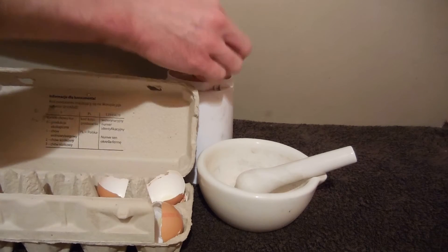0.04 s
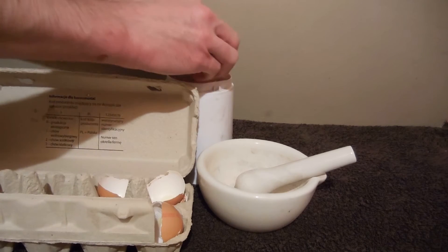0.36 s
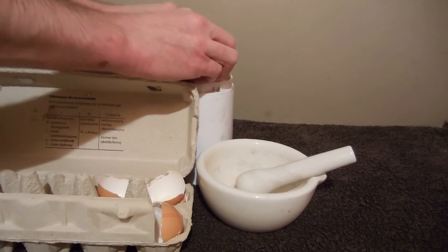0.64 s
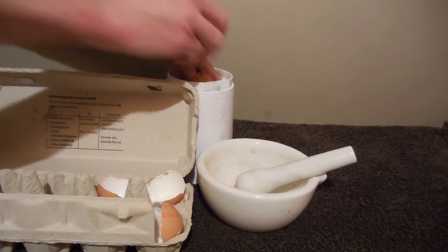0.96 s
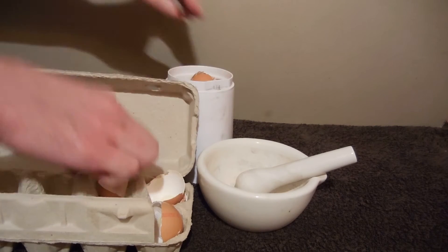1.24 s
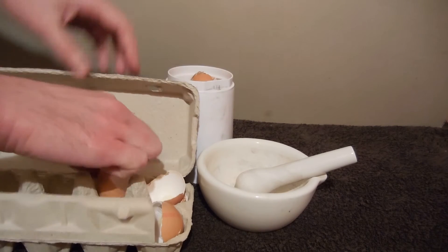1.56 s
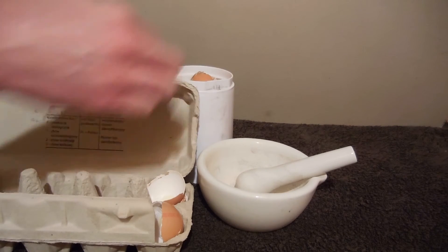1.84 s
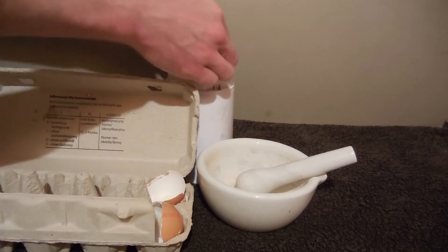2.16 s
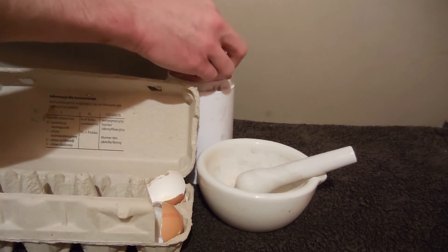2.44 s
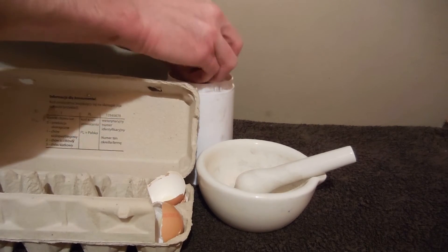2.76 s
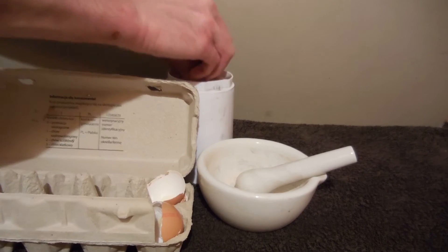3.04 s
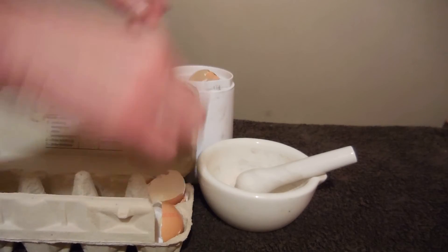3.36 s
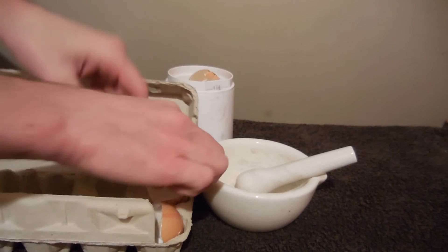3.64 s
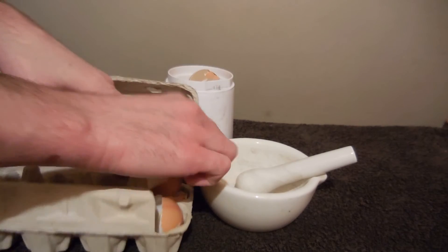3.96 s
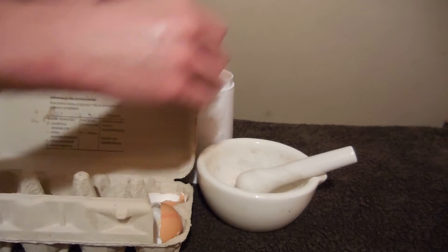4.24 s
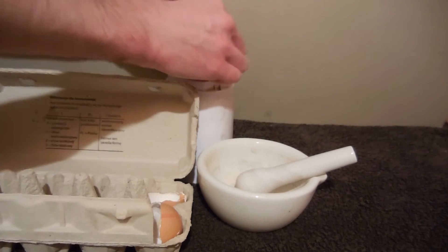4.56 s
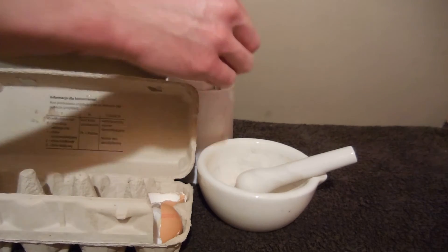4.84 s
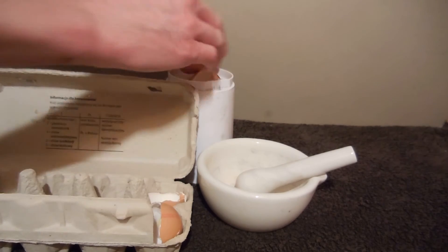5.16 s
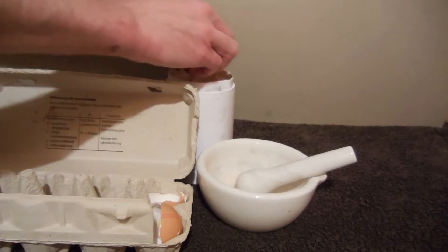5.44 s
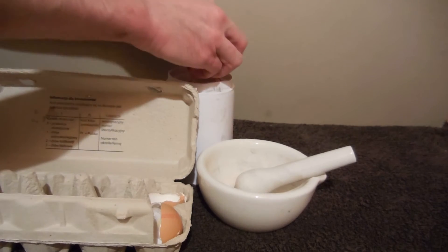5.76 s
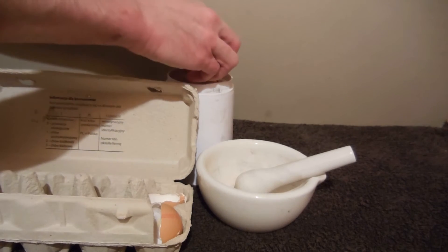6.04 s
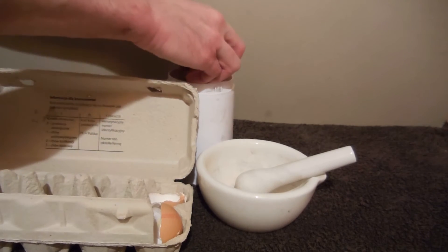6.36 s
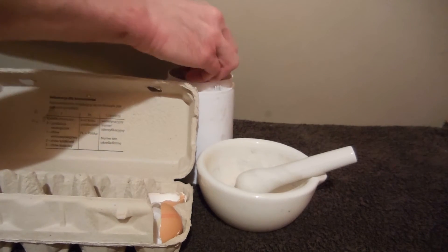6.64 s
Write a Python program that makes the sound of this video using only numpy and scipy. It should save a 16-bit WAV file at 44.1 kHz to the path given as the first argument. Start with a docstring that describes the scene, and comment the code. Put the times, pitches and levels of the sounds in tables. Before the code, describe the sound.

Close, brittle snaps and crunches of eggshell being pushed into a plastic cup, broken by pauses with soft rustles and scrapes.

```python
"""Eggshells in a grinder cup

A small room, a stereo microphone close by. Fingers press eggshell halves into a grinder's plastic cup.
The shell gives way in single snaps and in crunches of many tiny fractures; the cup rings and knocks along.
Between presses the pulp carton rustles and a shell scrapes and squeaks on the rim, over a quiet hiss."""
import sys
import numpy as np
from scipy import signal
from scipy.io import wavfile

SR = 44100
rng = np.random.default_rng(int(sys.argv[2]) if len(sys.argv) > 2 else 0)


def transcribe(signal):
    """Save signal, clipped to [-1, 1], as a 16-bit WAV file at the path in sys.argv[1]."""
    frames = np.atleast_2d(signal).T
    limited = np.clip(frames, -1, 1)
    pcm = np.round(limited * 32767).astype(np.int16)
    wavfile.write(sys.argv[1], SR, pcm)


N = 295911
EDGE_HZ = 15900  # top of the microphone's band

# A piece of shell caves in. Each row: start and length in seconds, crack and ring in relative dB,
# ring pitch in Hz.
CRUNCHES = [(0.099, 0.0085, -30, -28.5, 2350), (0.236, 0.021, -19, -22.5, 2350),
            (0.355, 0.034, -17.5, -17.5, 2080), (.544, 0.0097, -18.5, -18, 1900),
            (0.566, 0.012, -15.5, -19.5, 2070), (0.644, .01, -21.5, -44, 1980),
            (.783, 0.015, -24, -29.5, 1880), (0.998, 0.022, -38, -45, 2030),
            (2.128, 0.036, -38.5, -37.5, 2180), (2.236, 0.038, -26, -19, 2240),
            (2.451, 0.028, -25, -27, 2220), (2.596, 0.035, -29, -27, 2200), (2.64, 0.034, -19, -22.5, 2120),
            (2.799, 0.014, -21, -28, 2030), (2.903, 0.019, -22.5, -32, 1950),
            (5.434, 0.02, -30, -31.5, 1960), (5.579, 0.036, -30.5, -52, 2120),
            (5.743, 0.038, -34.5, -35.5, 2220), (5.813, 0.031, -28.5, -28.5, 2200),
            (5.974, 0.0072, -19, -18.5, 1890), (6.159, 0.02, -31.5, -34, 2130),
            (6.2, 0.024, -24, -29, 2300), (6.218, 0.014, -15.5, -17.5, 2230),
            (6.248, 0.017, -16.5, -21, 2070), (6.374, 0.0067, -28, -18, 2310),
            (6.465, 0.0091, -22, -19.5, 2460), (6.482, 0.056, -31, -28, 2500),
            (6.654, 0.012, -32, -35.5, 2370)]
# Spectra of the shell's crack and the cup's knock. Each row: frequency in Hz, relative level in dB.
CRACK_SPECTRUM = [(500, -48), (1500, -12), (3000, -3), (4200, 0), (6000, -0.5), (9000, 0.5), (13500, -0.5),
                  (16000, -2.5)]
KNOCK_SPECTRUM = [(25, -38), (48, -27), (65, -8.5), (110, -17), (200, -8), (300, -5), (560, 5.5),
                  (1100, 11), (1600, -21), (3000, -45.5)]


def amp(db):
    """Decibels to gain."""
    return 10 ** (np.asarray(db) / 20)


def read(points, hz):
    """Reads a table along a log-frequency axis."""
    f, value = np.transpose(points)
    return np.interp(np.log(hz + 1), np.log(f), value)


def sized(x, db, seconds):
    """Gives x the energy of a sound that holds db for so many seconds."""
    return x * amp(db) * np.sqrt(seconds * SR / (np.mean(x ** 2, 0).sum() + 1e-20))


def add(mix, start, sound):
    """Lays a stereo sound into the mix at start seconds."""
    part = mix[:, max(round(start * SR), 0):][:, :sound.shape[1]]
    part += sound[:, :part.shape[1]]


def pair(size, alike):
    """White noise at two microphones, which share the fraction alike of its power."""
    noise = rng.standard_normal((3, size))
    return np.sqrt(alike) * noise[0] + np.sqrt(1 - alike) * noise[1:]


def colour(points):
    """A minimum-phase filter of energy 1 with the given spectrum."""
    log_gain = np.log(amp(read(points, abs(np.fft.fftfreq(4096, 1 / SR)))))
    taps = np.fft.ifft(np.exp(np.conj(signal.hilbert(log_gain)))).real[:2048]
    return taps / np.linalg.norm(taps)


def through(x, taps):
    """Filters both channels and keeps the length."""
    return signal.fftconvolve(x, np.atleast_2d(taps), axes=1)[:, :x.shape[1]]


def held(t, length, rise_s, release_s):
    """A force that builds from t = 0, holds until length and dies away."""
    return np.clip(t / rise_s, 0, 1) * np.exp(-np.maximum(t - length, 0) / release_s)


def stroke(length, rise_s):
    """One short push of the fingers."""
    return held(np.arange(SR // 5) / SR, length, rise_s, release_s=0.011)


def grit(size, per_s, spread_db, grain_s):
    """Envelope of rms 1: tiny fractures at random moments, most weak and a few strong."""
    strength = amp(spread_db * np.minimum(rng.exponential(1, size), 3.5))
    strength *= rng.random(size) < per_s / SR
    power = signal.lfilter([1], [1, -np.exp(-2 / (grain_s * SR))], strength ** 2)
    return np.sqrt(power / (power.mean() + 1e-20) + 1e-6)


def shell(x, hz, width_hz):
    """The quickly damped resonance of a curved piece of shell."""
    b, a = signal.iirpeak(hz, hz / width_hz, SR)
    return signal.lfilter(b, a, signal.lfilter(b, a, x))


def splinter(x, ring_db, band_hz=(3800, 14000), width_hz=800, count=4):
    """Every fragment adds a few bright, quickly damped resonances of its own."""
    low, high = band_hz
    pitches = low * (high / low) ** rng.random(count)
    ring = sum(signal.lfilter(*signal.iirpeak(hz, hz / width_hz, SR), x) for hz in pitches)
    return x + amp(ring_db) * ring


def piece_hz(t):
    """The ring pitch of the piece of shell being pressed at time t."""
    pieces = np.array(CRUNCHES)
    return np.interp(t, pieces[:, 0], pieces[:, -1])


def unrest(loose_db=-19.5):
    """How much the fragments move: under the fingers, and for a while after each crunch."""
    # The fingers bear down. Each row: start and length in seconds, relative level in dB.
    presses = [(0, 0.049, -31.5), (.19, .03, -40.5), (0.296, 0.05, -30), (0.486, 0.25, -34.5),
               (0.958, 0.039, -41.5), (2.186, 0.34, -37), (2.5, 0.45, -36), (3.048, 0.092, -52),
               (5.445, 0.022, -36), (5.701, 0.15, -35), (6.32, 0.055, -30.5), (6.44, 0.3, -41)]
    t = np.arange(0, N, 100) / SR
    pressed = [amp(db) * held(t - start, length, rise_s=0.011, release_s=0.04)
               for start, length, db in presses]
    loosened = [amp(db + loose_db) * held(t - start, length, rise_s=length, release_s=0.076)
                for start, length, db, _, _ in CRUNCHES]
    return np.interp(np.arange(N) / SR, t, np.linalg.norm(pressed + loosened, axis=0))


def shifting(crack_db=-3, ring_db=-6, knock_db=-18, width_hz=750):
    """Loose fragments tick against each other while the fingers press."""
    ticks = grit(N, per_s=860, spread_db=5, grain_s=0.0028)
    push = ticks * pair(N, alike=0.83)
    # a resonance that follows the pitch of the piece: shift down, smooth, shift back
    carrier = np.exp(2j * np.pi * np.cumsum(piece_hz(np.arange(N) / SR)) / SR)
    smoothed = signal.lfilter(*signal.butter(2, width_hz / 2, fs=SR), push / carrier)
    ring = sized((carrier * smoothed).real, ring_db, N / SR)
    crack = sized(through(ticks * pair(N, alike=0.79), colour(CRACK_SPECTRUM)), crack_db, N / SR)
    knock = sized(through(push, colour(KNOCK_SPECTRUM)), knock_db, N / SR)
    return unrest() * (crack + ring + knock)


def snaps(crack_db=-9.5, ring_db=-5.5, knock_db=-23, snap_s=0.004):
    """A crack runs through the shell, leaves the piece ringing and knocks the cup."""
    # Each row: start in seconds, crack and ring in relative dB.
    breaks = [(0.044, -23, -21), (0.0711, -23, -24), (0.182, -28, -27.5), (0.3089, -14, -29),
              (0.3503, -6.5, -20), (0.365, -4.5, -11), (0.4859, -10.5, -25), (0.5139, -8, -15.5),
              (0.5308, -9, -7.5), (0.5447, -9.5, -16), (0.6473, -16, -20), (0.6722, -9.5, -33),
              (0.6904, -11, -37), (0.752, -9.5, -25.5), (0.7827, -8.5, -25), (0.9495, -24, -37),
              (1.1792, -36.5, -46), (1.968, -38.5, -48), (2.1321, -16, -26.5), (2.2574, -3.5, -14.5),
              (2.4375, -17, -22), (2.4557, -12.5, -15.5), (2.5989, -20, -17), (2.7184, -11, -16.5),
              (2.7863, -4, -18), (2.8466, -15, -46), (2.8679, -13, -47), (2.8773, -17, -45),
              (2.904, -7, -24), (2.965, -16.5, -51), (2.9901, -21.5, -47), (3.0581, -24, -41),
              (3.2831, -25.5, -40.5), (3.6606, -25.5, -27), (3.8167, -40, -36), (4.4923, -30, -41.5),
              (4.772, -30, -43), (4.8979, -31, -42), (5.0174, -36, -32), (5.3221, -27, -21.5),
              (5.4194, -16.5, -27), (5.4377, -23, -17), (5.451, -15.5, -35), (5.5134, -18, -26),
              (5.5235, -16.5, -35), (5.5842, -7, -18), (5.6093, -14, -18.5), (5.685, -13.5, -23),
              (5.7442, -8.5, -28), (5.7875, -8, -22), (5.8186, -4.5, -10.5), (5.905, -13, -23.5),
              (5.9184, -8, -12), (5.9304, -12.5, -18.5), (5.9806, -8, -4.5), (6.1215, -12.5, -18),
              (6.1584, -7.5, -14.5), (6.2062, -6, -13.5), (6.3794, -6, -23), (6.4685, -4.5, -20),
              (6.5522, -11.5, -38.5)]
    crack, knock = colour(CRACK_SPECTRUM), colour(KNOCK_SPECTRUM)
    out, t = np.zeros((2, N)), np.arange(SR // 25) / SR
    burst = held(t, length=0.0027, rise_s=0.0012, release_s=0.00079)
    kick = held(t, length=0.00066, rise_s=0.00068, release_s=0.0016)
    for start, treble_db, shell_db in breaks:
        tear = splinter(through(burst * pair(len(t), alike=0.58), crack), ring_db=-3.5)
        push = kick * pair(len(t), alike=0.92)
        add(out, start, sized(tear, treble_db + crack_db, snap_s))
        add(out, start, sized(shell(push, piece_hz(start), width_hz=900), shell_db + ring_db, snap_s))
        add(out, start, sized(through(push, knock), (treble_db + shell_db) / 2 + knock_db, snap_s))
    return out


def crunches(ring_db=-2, knock_db=-15):
    """One fracture sets off the next in an avalanche; the harder it breaks, the harder the cup knocks."""
    crack, knock = colour(CRACK_SPECTRUM), colour(KNOCK_SPECTRUM)
    out = np.zeros((2, N))
    for start, length, treble_db, shell_db, hz in CRUNCHES:
        force = stroke(length, rise_s=0.19 * length)
        force *= grit(len(force), per_s=1900, spread_db=1.34, grain_s=0.00055)
        push = force * pair(len(force), alike=0.93)
        tear = splinter(through(force * pair(len(force), alike=0.58), crack), ring_db=3)
        add(out, start, sized(tear, treble_db, length))
        add(out, start, sized(shell(push, hz, width_hz=1330), shell_db + ring_db, length))
        add(out, start, sized(through(push, knock), treble_db + knock_db, length))
    return out


def squeaks():
    """Uneven stick and slip drives one narrow resonance of the shell: a thin, husky tone."""
    # Each row: start and length in seconds, level in dB, pitch in Hz.
    slips = [(0.176, 0.03, -39, 2454), (3.862, 0.021, -35, 2170), (5.037, 0.025, -34.5, 1312),
             (5.068, 0.032, -46, 1290), (5.115, .05, -53, 1280), (5.186, 0.035, -40, 1370),
             (5.3, 0.018, -38.5, 2110)]
    out = np.zeros((2, N))
    for start, length, db, hz in slips:
        force = stroke(length, rise_s=0.0031)
        tone = shell(force * pair(len(force), alike=0.66), hz, width_hz=180)
        add(out, start, sized(tone, db, length))
    return out


def rubbing(strokes, spectrum, rise_share, alike, ring_db, band_hz, brighten=0):
    """Rough surfaces catch on each other in dense small slips, and the shell rings along."""
    out = np.zeros((2, N))
    hz, surface_db = np.transpose(spectrum)
    usual_db = np.mean([db for _, _, db in strokes])
    for start, length, db in strokes:
        force = stroke(length, rise_s=rise_share * length)
        force *= grit(len(force), per_s=1500, spread_db=2.5, grain_s=0.002)
        tilt_db = brighten * (db - usual_db) * np.log2(hz)  # brighten gives harder strokes more treble
        surface = colour(np.transpose([hz, surface_db + tilt_db]))
        rasp = through(force * pair(len(force), alike), surface)
        add(out, start, sized(splinter(rasp, ring_db, band_hz, width_hz=840), db, length))
    return out


def carton_rustle():
    """Fingers and shells rub the pulp carton."""
    # Each row: start and length in seconds, level in dB.
    rubs = [(1.275, 0.02, -39.5), (1.333, 0.027, -43), (1.39, 0.077, -48), (1.5, 0.0059, -44),
            (3.447, 0.034, -35.5), (3.535, 0.021, -33.5), (3.59, 0.083, -31.5), (3.74, 0.048, -42.5),
            (3.855, 0.068, -35.5), (4.075, 0.032, -46.5)]
    # Each row: frequency in Hz, relative level in dB.
    pulp_spectrum = [(47, -64), (80, -37.5), (353, -10.5), (802, -6), (877, -8), (1310, -2), (1430, -10),
                     (2180, -9), (8410, -15), (16000, -26.5)]
    return rubbing(rubs, pulp_spectrum, rise_share=0.28, alike=0.86, ring_db=-2.5, band_hz=(1274, 4470))


def rim_scrapes():
    """A shell slides on the rim of the cup."""
    # Each row: start and length in seconds, level in dB.
    slides = [(4.49, 0.028, -33), (4.524, 0.046, -31.5), (4.6, 0.052, -40), (4.668, 0.025, -41),
              (4.787, 0.048, -44), (4.87, 0.055, -49), (4.938, 0.026, -39.5), (4.98, 0.14, -48),
              (5.223, 0.061, -43), (5.298, 0.022, -39.5)]
    # Each row: frequency in Hz, relative level in dB.
    rim_spectrum = [(200, -28), (450, -16), (700, -9), (1300, -2), (2400, 5.5), (3500, -6.5), (5300, -9.5),
                    (8300, -13.5), (11000, -12), (16000, -16.5)]
    return rubbing(slides, rim_spectrum, rise_share=0.068, alike=0.79, ring_db=3.5,
                   band_hz=(4340, 10100), brighten=0.24)


def cup(x, ring_db=-19, cover_db=2):
    """Each blow sets the modes of the plastic cup ringing; the hand over its mouth favours some."""
    # Each row: frequency in Hz, relative energy in dB, seconds to fall by 60 dB.
    modes = [(536, -15, 0.13), (958, -6.5, 0.24), (1068, -13, 0.13), (1398, -9, .18), (1536, -8.5, 0.15),
             (1700, -12, 0.14), (1765, -7.5, 0.205), (1874, -21, 0.33), (2178, -16, 0.15),
             (2371, -14.5, 0.065), (2490, -16, 0.078), (2524, -5.5, 0.14), (3103, -25, .2),
             (3842, -9.5, 0.15)]
    t = np.arange(SR // 3) / SR
    cover = cover_db * rng.standard_normal(len(modes))
    response = np.zeros(len(t))
    for (hz, db, t60), shade_db in zip(modes, cover):
        unit_energy = np.sqrt(4 * np.log(1000) / (t60 * SR))
        response += unit_energy * amp(db + shade_db - 60 * t / t60) * np.sin(2 * np.pi * hz * t)
    return amp(ring_db) * through(x, response)


def room(x, build_s=0.0031, apart_hz=3500):
    """Table and wall answer within milliseconds; the tail dies sooner in the treble."""
    # Each row: frequency in Hz, seconds to fall by 60 dB.
    decay_times = [(300, 0.7), (2000, 0.34), (5000, 0.44), (14000, 0.17)]
    # Each row: frequency in Hz, strength of the room's answer in dB.
    strengths = [(300, -1.5), (2000, -3), (12000, -4)]
    hz, t, noise = signal.stft(rng.standard_normal((3, SR // 2)), SR, nperseg=256)
    hz = hz[:, None]
    # long waves reach both microphones alike
    alike = np.clip(0.046 + 0.98 * np.exp(-(hz / apart_hz) ** 2), 0, 1)
    stereo = np.sqrt(alike) * noise[0] + np.sqrt(1 - alike) * noise[1:]
    t60 = read(decay_times, hz)
    decay = amp(read(strengths, hz) - 60 * t / t60) * np.sqrt(2 * np.log(1000) / (t60 * SR))
    tail = signal.istft(stereo * decay, SR, nperseg=256)[1]
    onset = np.minimum(np.arange(tail.shape[1]) / (build_s * SR), 1)
    return through(x, tail * onset)


def drifting(x, response, turn_hz, count=3):
    """The moving hand changes the sound's paths: a few responses take turns at constant power."""
    turn = 2 * np.pi * turn_hz * np.arange(N) / SR
    return sum(response(x * np.sqrt(2 / count) * np.cos(turn + np.pi * k / count)) for k in range(count))


def hiss(db=-57.5):
    """The room's quiet, steady hiss, wide across the two microphones."""
    # Each row: frequency in Hz, relative level in dB.
    spectrum = [(25, -28), (70, -24), (100, -8.5), (150, -15.5), (400, -9.5), (1200, -4), (4000, -9.5),
                (13000, -18), (16000, -20)]
    return amp(db) * through(pair(N, alike=0.2), colour(spectrum))


def scene():
    """Breaking shell and handling noises up close, with the cup's ring and the room behind them."""
    in_cup = snaps() + crunches() + shifting() + rim_scrapes()
    near = in_cup + carton_rustle() + squeaks()
    ringing = drifting(in_cup, cup, turn_hz=0.397)  # too faint to stir the room
    return near + ringing + drifting(near, room, turn_hz=0.49) + hiss()


def record(dry, ceiling=0.86):
    """The camera's microphone rounds off the highest peaks, then limits the band."""
    rounded = ceiling * np.tanh(dry / ceiling)
    lowpass = signal.firwin(511, EDGE_HZ, window=("kaiser", 9), fs=SR)
    return signal.oaconvolve(rounded, lowpass[None], "same")


dry = scene()
out = record(dry)
transcribe(out)
```